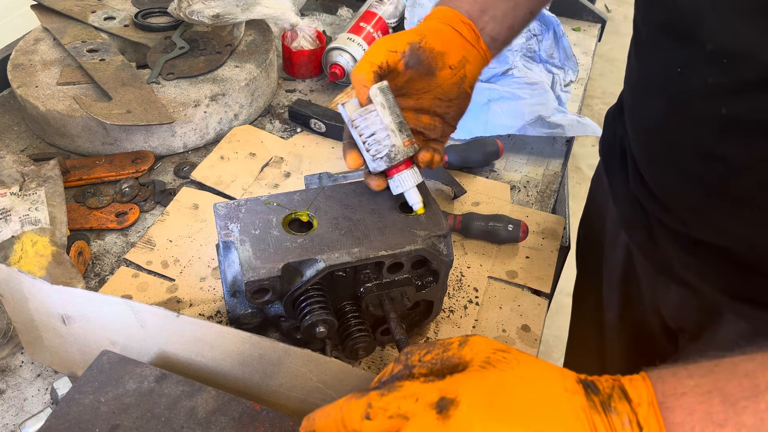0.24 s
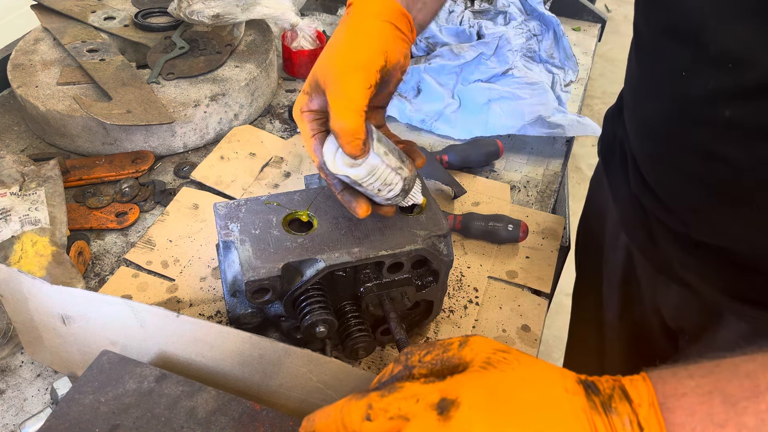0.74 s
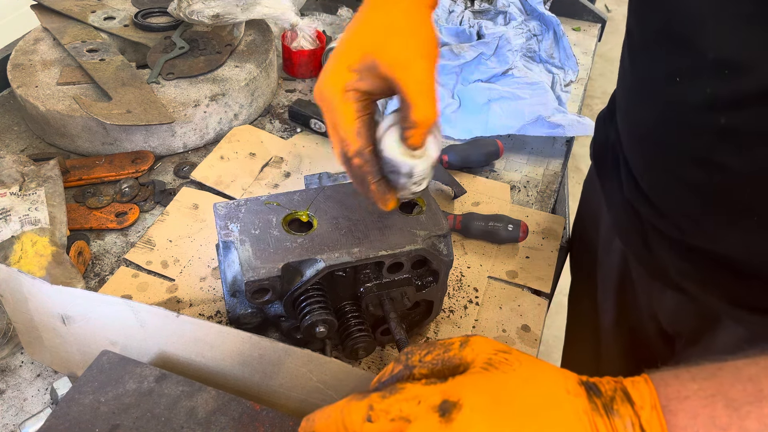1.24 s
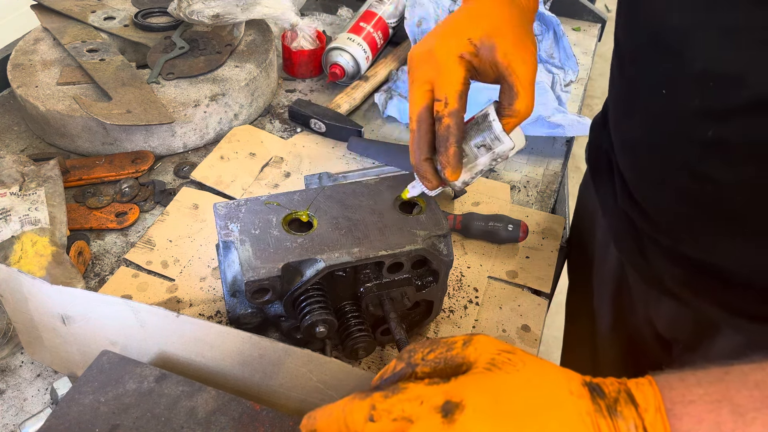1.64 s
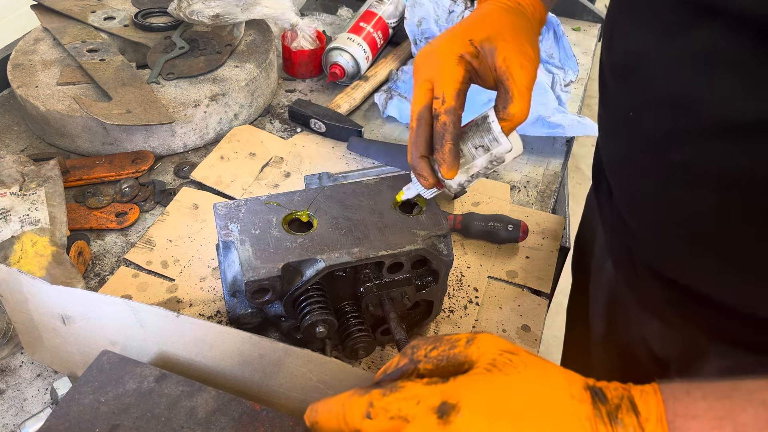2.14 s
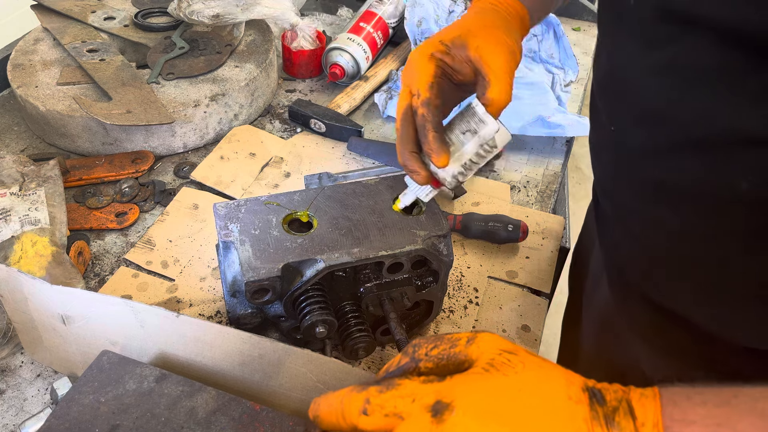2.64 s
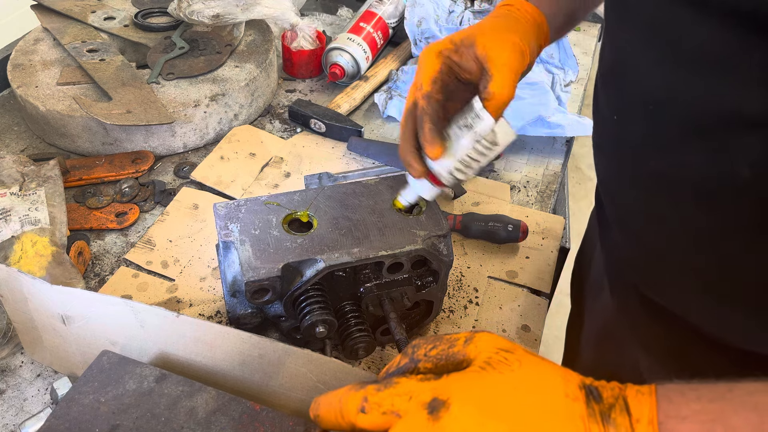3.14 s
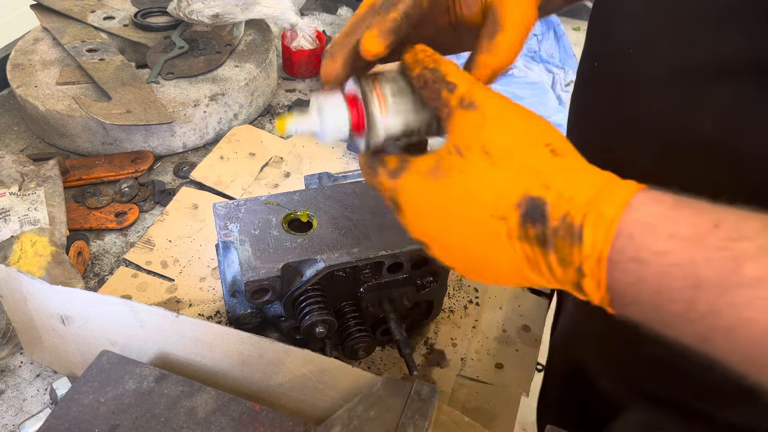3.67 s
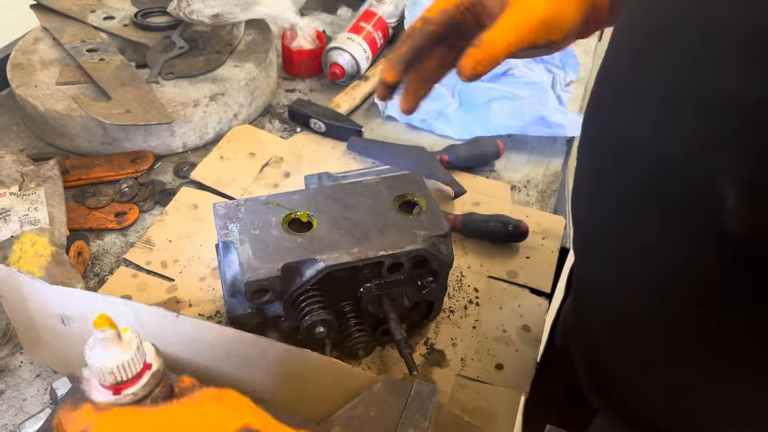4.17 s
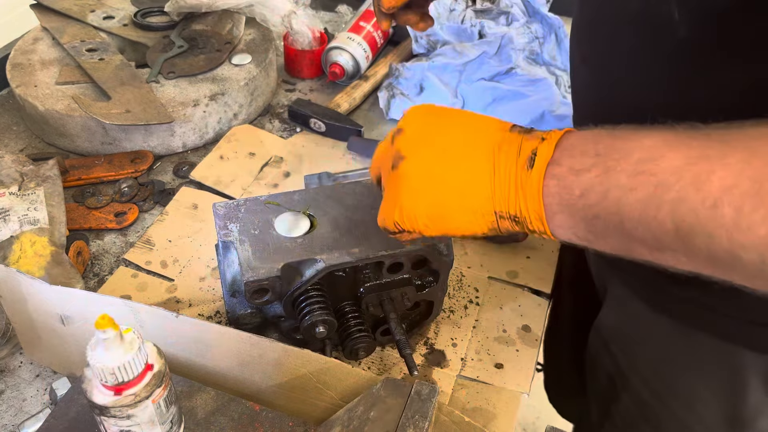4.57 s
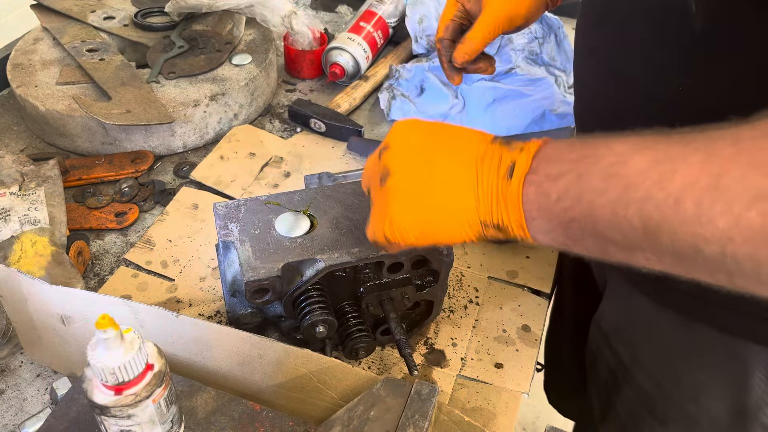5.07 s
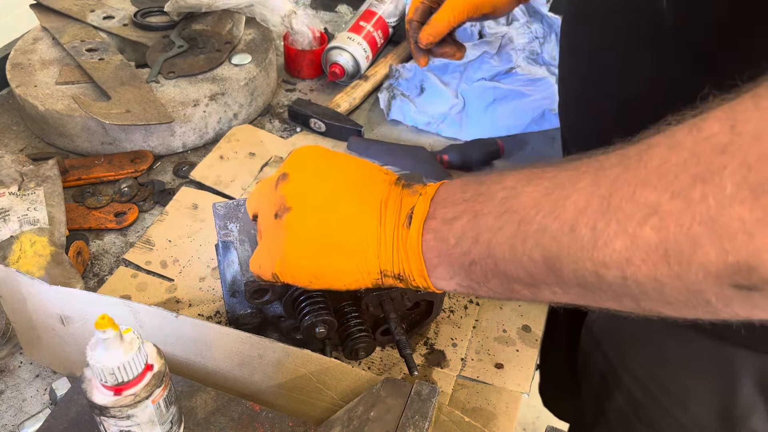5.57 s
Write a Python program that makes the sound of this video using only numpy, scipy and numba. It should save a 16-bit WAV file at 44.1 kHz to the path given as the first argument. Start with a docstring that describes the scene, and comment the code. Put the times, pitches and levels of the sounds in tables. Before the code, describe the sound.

A plastic bottle's nozzle drags over an iron casting from the start until about 3.2 seconds. It sticks and slips in faint, gritty, slightly hollow strokes, with scattered ticks and soft thuds as it bumps the rims of holes. From around 3.3 seconds a rubber glove swishes softly, with a small tick at 3.7. At about 4.2 seconds the bottle lands on the bench with one sharp, hollow knock, by far the loudest sound. Metal plugs then clink brightly onto the casting at 4.3 and 4.6 seconds, the second rocking briefly. Lighter clicks follow at 4.9, a tap with a soft thump at 5.1, and small nudging ticks near 5.4 and 5.8, with faint glove brushes. Distant engines drone quietly throughout, turning a little higher and wavering after 4.3 seconds. A phone microphone hears it all from close by, in a workshop with a short echo.

```python
"""A sealant bottle's nozzle is dragged round two holes in an iron casting, in a workshop. It sticks and
slips, which makes the plastic bottle ring. A gloved hand swings across with a rustle and puts the bottle
down with a hollow knock. Then the scene changes: metal plugs clink as they are dropped onto the holes
and nudged into place. Engines drone faintly outside, and a phone close by picks it all up."""
import sys
import numpy as np
from scipy import signal
from scipy.fft import rfft, irfft
from scipy.io import wavfile
from scipy.ndimage import uniform_filter1d
from numba import njit

SR = 44100
rng = np.random.default_rng(int(sys.argv[2]) if len(sys.argv) > 2 else 0)


def wav_out(sig):
    """Save sig, one row per channel (or a flat mono array), as 16-bit PCM at SR to the path in sys.argv[1]."""
    wavfile.write(sys.argv[1], SR, np.round(np.clip(np.atleast_2d(sig).T, -1, 1) * 32767).astype(np.int16))


N = 256220
T = np.arange(N) / SR

# Background rumble and hiss in each scene. Each row: frequency in Hz, relative level in dB.
BOTTLE_SCENE_AIR = [(29, -27), (50, -8.5), (140, -20.5), (161, -30.5), (195, -27), (613, -47.5),
                    (1790, -54), (2890, -70.5), (3760, -58.5), (8460, -69), (9530, -80), (11800, -61),
                    (13500, -73), (14500, -86.5)]
PLUG_SCENE_AIR = [(35, -31.5), (60, -25.5), (102, -1.5), (246, -10.5), (317, -17), (503, -27),
                  (1180, -40.5), (1270, -38.5), (2780, -51), (3270, -46), (4840, -54), (9670, -51),
                  (15000, -61)]
# Engine tones. Each row: time in seconds, pitch in Hz, level in dB.
ENGINE_IDLE = [(0.0, 48.5, -64), (0.1, 41.5, -66), (0.15, 41.9, -55.5), (0.74, 42.38, -47),
               (1.18, 44.3, -48), (2.33, 43.3, -48), (2.69, 45.87, -72), (3.27, 44.25, -59),
               (3.47, 44.8, -51), (3.7, 41.8, -48.5), (4.15, 45.7, -79)]
ENGINE_REVVING = [(4.27, 104.2, -62), (4.442, 103, -56), (4.858, 140.3, -58.5), (5.034, 138, -54),
                  (5.144, 151.4, -55.5), (5.518, 140.1, -56.5), (5.584, 148.7, -67.5), (5.81, 148.8, -61.5)]
ENGINE_DRONE = [(4.5, 60.1, -76), (4.7, 61.6, -60), (4.85, 65.45, -65), (4.93, 68.2, -82),
                (5.11, 72.05, -52), (5.53, 71.8, -54), (5.81, 68, -71)]
ENGINE_WHINE = [(4.27, 244.2, -70), (4.35, 244.1, -53.5), (4.522, 247.3, -70.5), (4.72, 244, -60),
                (4.824, 244, -72.5), (5.458, 233.3, -73), (5.81, 243.3, -67.5)]
# Bands of noise from the engines, the glove and the dragged bottle.
# Each row: centre in Hz, width in Hz, relative level in dB.
ENGINE_RUMBLE = [(70, 1.4, -70.5), (90, 5.7, -71), (146.6, 7.1, -70)]
GLOVE_SWISH = [(3760, 2650, 0)]
GLOVE_TREBLE = [(7700, 2500, 1), (11400, 2400, 3)]
GLOVE_RUB = [(574, 590, 2), (1568, 1260, -3)]
DRAG_BELLY = [(460, 540, 0)]
DRAG_UPPER = [(3030, 250, -17), (3257, 107, -19), (4400, 780, -19)]
DRAG_SCRATCH = [(2610, 1270, 1), (4380, 2700, -0.5)]
DRAG_TREBLE = [(7270, 810, 2.5), (8530, 1360, 2.5), (11650, 3000, 6.5)]
# The arm swings across and back. Each row: time in seconds, swish level in dB, then treble and rub
# in dB compared with the swish.
ARM_SWING = [(3.27, -93, -7, 2), (3.352, -84.5, 10.5, -1.5), (3.404, -79.5, 2, 0), (3.444, -93, 8.5, 5.5),
             (3.634, -72, 5, -3), (3.67, -78.5, 7, 1), (3.724, -58.5, 4, -3.5), (3.736, -69.5, 1, 1.5),
             (3.888, -83, 2, 10), (3.974, -103, 10, -7), (4.004, -71, 7, -28), (4.018, -70.5, 6, -7.5),
             (4.118, -88, 10, 4), (4.13, -91, -4, 2)]
# Short glove rustles. Each row: start, loudest moment and end in seconds, level in dB, rub in dB
# compared with the swish.
GLOVE_BRUSHES = [(5.127, 5.192, 5.25, -70, -3), (5.66, 5.684, 5.72, -79.5, -9.5),
                 (5.732, 5.775, 6.1, -76.5, -20)]
# The notes that struck things ring with. Each row: pitch in Hz, relative level in dB, ring time in
# seconds (the time to fade by 60 dB).
CASTING_LOW_NOTES = [(631, -1, 0.029), (707.4, 3.5, 0.047)]
CASTING_NOTES = [(1720, -4, .04), (2150, -4, .02), (2540, -3, .025), (3400, -5, .02), (4800, -9, .03),
                 (5459, -14, .025), (6089, -18, .03)]
PLUG_LOW_NOTES = [(1745, -7, .12), (2980, -9, .05), (3155, 3, .05), (3520, -1, .04), (4290, -14, .05),
                  (5459, -7, .04), (6089, -13, .05)]
PLUG_HIGH_NOTES = [(7480, -1.5, 0.038), (10200, 9, 0.017), (9210, 12.5, 0.13), (9600, 9.5, 0.03),
                   (11720, -1, 0.05), (12780, -4.5, 0.03)]
ROCKING_NOTES = [(690, 0, .03), (1745, -13.5, 0.0548), (2954, 2.5, 0.031), (3260, -1, 0.052),
                 (3530, -4.5, 0.037)]
BENCH_NOTES = [(119, -8, 0.042), (189, -2.5, 0.039), (319, -1, 0.044), (540, -4, 0.029)]
BOTTLE_NOTES = [(1400, -16.5, 0.011), (1650, 9.5, 0.0066), (1945, -12, 0.016), (2690, -9, 0.0064),
                (3760, -18, 0.0113), (6970, -21, 0.012)]
# Plugs touch the casting. Each row: start in seconds, level in dB, boosts in dB for the casting's low
# ring and for the plug's ring, finger damping from 0 (free) to 1 (held).
PLUG_TOUCHES = [(4.3365, -38, -16, -17, 0.45), (4.3395, -31.5, -7, 3, 1), (4.3455, -35.5, -5.5, -4.5, 0.63),
                (4.3601, -32.5, -14.5, -8, 0.66), (4.388, -49, -1.5, -3, 0.84),
                (4.6470, -38.5, -35, 16.5, 0.37), (4.6489, -22, -8, 4, 0.96), (4.6748, -43, -22, 2, 0.53),
                (4.9032, -36, -13.5, -10.5, 0.36), (4.912, -41, -17, -29, 0.3), (4.9491, -60.5, 9, -22, 1),
                (5.0945, -39, -10.5, -14, 0.18), (5.3598, -44, -1.5, -21.5, 0.6),
                (5.368, -51.5, -2, -21, 0.85), (5.3744, -52.5, 1.5, -27, 0.65),
                (5.428, -49.5, -14.5, -22, 0.45), (5.4367, -43.5, -4, -8, 0.82),
                (5.4414, -48.5, 9.5, -7, 0.99), (5.767, -57, -14, -10, 1), (5.778, -63, -14, -9.5, 1),
                (5.791, -59, -10, -14, 0.97)]
# A loose plug rocks on its seat. Each row: start in seconds, level in dB.
PLUG_ROCKS = [(4.676, -42), (4.697, -50), (4.719, -53), (4.745, -60), (4.792, -58), (4.848, -63),
              (4.862, -49.5)]
# A plug pressed home thumps the bench. Each row: start in seconds, level in dB, pitch in Hz, ring time
# in seconds.
PLUG_THUMPS = [(5.096, -43, 178.5, 0.18)]
# The bottle lands: first touch, full blow, quick echo off a nearby surface.
# Each row: start in seconds, level in dB.
BOTTLE_LANDING = [(4.1609, -13.5), (4.1613, 1), (4.1722, -23.5)]
# The part of the knock that rings on in the room. Each row: centre in Hz, width in Hz, level in dB.
KNOCK_ECHO_BAND = [(1630, 330, -4.5)]
# The nozzle slides on iron. Each row: start and end in seconds, start and end level in dB.
NOZZLE_STROKES = [(0, 0.043, -75, -82), (0.091, 0.159, -90, -61), (0.207, 0.321, -72.5, -77),
                  (0.328, 0.401, -77.5, -68), (0.471, 0.587, -83.5, -67), (0.677, 0.74, -69.5, -71),
                  (0.774, 0.881, -97.5, -74), (0.9, 1.063, -66, -86.5), (1.141, 1.252, -78, -91),
                  (1.476, 1.522, -68, -70.5), (1.636, 1.749, -74.5, -84), (1.748, 1.944, -70.5, -75.5),
                  (2.031, 2.181, -67.5, -77), (2.245, 2.415, -67.5, -69), (2.45, 2.478, -80, -76),
                  (2.543, 2.611, -82.5, -61.5), (2.644, 2.655, -64, -90), (2.751, 2.813, -75, -63.5),
                  (2.797, 2.837, -71, -88), (2.888, 2.94, -75, -67.5), (2.923, 2.971, -61.5, -78.5),
                  (3.079, 3.089, -70, -68.5), (3.17, 3.265, -73, -101)]
# The nozzle bumps a rim. Each row: start in seconds, tick and thud levels in dB, tick pitch in Hz.
RIM_BUMPS = [(0.159, -48, -45, 1050), (0.3934, -47.5, -64, 950), (.714, -47.5, -57, 1390),
             (0.9047, -39, -42.5, 1040), (2.036, -77, -52, 1600), (2.277, -45.5, -61, 1480),
             (2.592, -59, -46.5, 1310), (2.7968, -45, -61, 1398), (2.932, -51, -44, 1480),
             (2.947, -75, -50, 1498), (3.086, -56, -77, 1900), (3.171, -46, -64, 3600),
             (3.171, -42, -48, 1410), (3.180, -47.5, -49, 1780), (3.72, -51, -61, 2300),
             (3.720, -40, -66, 7290)]
# How the grip colours the bottle's sound. Each row: time in seconds, main ring in Hz, then the upper,
# belly, hollow, scratch, treble and creak levels in dB compared with the main ring.
BOTTLE_GRIP = [(0, 1615, 12, -14, 3.5, -18.5, -9.5, 2.5), (.75, 1720, 10.5, -19, 0.5, -20, -7, 2),
               (.95, 1707, 10.5, 7, 2.5, -19, -16, 1), (1.3, 1690, 17, -4.5, 8.5, -19, 8, -2),
               (1.45, 1380, 5, -6, 1, -5, -10, -28), (2.35, 1350, -13, 2, -2, -23, -8.5, -15),
               (2.56, 1610, 1, 0.5, -3, -9, -10, -9.5)]
# The phone's two microphones. Each row: frequency in Hz, how far the left leads in radians, how much
# louder the left is in dB.
MICROPHONES = [(30, 0, 1.7), (1000, -.27, 1.5), (2500, -.6, -2.8), (4500, -1.2, -1.5), (6200, -2.0, -1.5),
               (8200, .3, -2.7), (10500, 1.9, -2.5), (13000, 5.2, -1.4), (16000, 8, -1.4)]


def undb(db):
    """Turn decibels into a gain."""
    return 10 ** (np.asarray(db) / 20)


def level(x, db=0):
    """Scale a sound to an average (rms) level in dB."""
    return x * undb(db) / np.sqrt(np.mean(x ** 2))


def curves(rows):
    """Join a table's timed rows with straight lines, one curve per column."""
    times, *columns = np.transpose(rows)
    return [np.interp(T, times, column) for column in columns]


@njit
def bandpass(x, hz, width):
    """Keep the sound near a centre frequency that may move."""
    out, band, low = np.empty(len(x)), 0., 0.
    for i in range(len(x)):
        tuning, loss = np.tan(np.pi * hz[i] / SR), width / hz[i]
        swing = (band + tuning * (x[i] - low)) / (1 + tuning * (tuning + loss))
        band, low = 2 * swing - band, low + 2 * tuning * swing
        out[i] = loss * swing
    return out


def bands(x, table, passes=1):
    """Keep a table's frequency bands; more passes make their edges steeper."""
    for _ in range(passes):
        x = sum(undb(db) * bandpass(x, np.full(len(x), float(hz)), float(width))
                for hz, width, db in table)
    return x


def wander(per_second):
    """A smooth random wobble, roughly 1 in size."""
    hold = int(SR / per_second)
    steps = np.repeat(rng.standard_normal(N // hold + 1), hold)
    return 1.6 * uniform_filter1d(steps, hold)[:N]


def ring(notes, push_s=0.0001, damping=0., scatter_db=3):
    """Fading notes after a blow; a longer push softens the start, damping shortens the ring."""
    t = T[:SR // 4]
    out = np.zeros(len(t))
    for hz, db, ring_s in notes:
        gain = undb(db + scatter_db * rng.standard_normal())
        detune = 1 + rng.standard_normal() / 150
        fade_s = max(ring_s * (1 - .9 * damping), 1 / hz)
        out += gain * np.sin(2 * np.pi * hz * detune * t) * 1000. ** (-t / fade_s)
    out *= 1 - np.exp(-(t / push_s) ** 2)
    return out / np.abs(out).max()


def tick(fade_s, hz, width, passes=2):
    """A short burst of noise in one band."""
    t = T[:SR // 4]
    burst = rng.standard_normal(len(t)) * 1000. ** (-t / fade_s)
    burst = bands(burst, [(hz, width, 0)], passes)
    return burst / np.abs(burst).max()


def add(out, start_s, x):
    """Mix a sound into out at a start time."""
    i = int(start_s * SR)
    out[i:i + len(x)] += x[:N - i]


def room(x, low_fade_s=0.39, high_fade_s=0.55):
    """The workshop's echoes in stereo; nearby surfaces answer first and loudest."""
    t = T[:SR]
    noise = rng.standard_normal((2, SR))
    low = signal.sosfilt(signal.butter(1, 3000, fs=SR, output="sos"), noise)
    tail = (low + 0.039 * low[::-1]) * 1000. ** (-t / low_fade_s)
    tail += (noise - low) * 1000. ** (-t / high_fade_s)
    tail *= np.clip(t / 0.0022, 0, 1) * (1 + 2 * np.exp(-t / 0.0096))
    tail /= np.sqrt(np.sum(tail ** 2) / 2)
    return signal.fftconvolve(x[None], tail, axes=1)[:, :N]


def air(spectrum, db):
    """Soft rumble and hiss; left and right are alike in the bass, less so in the treble."""
    freqs = np.arange(N // 2 + 1) * SR / N + 1
    hz, shape_db = np.transpose(spectrum)
    colour = undb(np.interp(np.log(freqs), np.log(hz), shape_db, left=-60))
    mid, side = rfft(rng.standard_normal((2, N))) * colour
    side *= np.clip(.2 + freqs / 5000, 0, .7)
    stereo = irfft(np.array([mid + side, mid - side]), N)
    return level(stereo, db) * undb(0.99 * wander(1.8))


def engine(rows, waver=0.00604, flutter_db=1.5):
    """An engine outside: one tone that wavers in pitch and loudness."""
    hz, db = curves(rows)
    phase = 2 * np.pi * np.cumsum(hz * (1 + waver * wander(4.8))) / SR
    return np.sqrt(2) * np.sin(phase) * undb(db + flutter_db * wander(20)) * (T >= rows[0][0])


def engine_rumble():
    """Engine tones blurred into narrow bands of low noise."""
    return sum(level(bands(rng.standard_normal(N), [(hz, width, 0)]), db)
               for hz, width, db in ENGINE_RUMBLE)


def glove():
    """A rubbery glove rustles, a bright swish over a dull rub: one long swing, then short brushes."""
    friction = rng.standard_normal(N) * undb(1.5 * wander(110) + wander(40))
    swish, treble, rub = (level(bands(friction, table, passes=2))
                          for table in (GLOVE_SWISH, GLOVE_TREBLE, GLOVE_RUB))
    arm_db, treble_db, rub_db = curves(ARM_SWING)
    out = undb(arm_db) * (swish + undb(treble_db) * treble - undb(rub_db) * rub)
    out *= (T >= ARM_SWING[0][0]) & (T <= ARM_SWING[-1][0])
    for start, peak, end, db, rub_db in GLOVE_BRUSHES:
        swell_db = np.interp(T, [start, peak, end], [-14, 0, -14])
        brush = swish + 0.83 * treble - undb(rub_db) * rub
        out += undb(db + swell_db) * brush * (T >= start) * (T <= end)
    return out


def plug_clinks():
    """Each touch rings both plug and casting; one plug rocks, and one is pressed home with a thump."""
    out = np.zeros(N)
    for start, db, low_db, plug_db, damping in PLUG_TOUCHES:
        free = 1 - damping  # a free plug rings more, a held one ticks more
        tick_hz = 2516 * 2 ** (-low_db / 14.5)  # less low ring, higher tick
        hit = (1 - .6 * free) * tick(.02, tick_hz, 1.5 * tick_hz)
        hit += 1.1 * free * ring(CASTING_NOTES, damping=damping)
        hit += undb(low_db) * ring(CASTING_LOW_NOTES, push_s=0.0022, damping=.4 * damping)
        bright = 0.201 * ring(PLUG_HIGH_NOTES, damping=damping) + 0.92 * tick(0.0042, 10070, 4600)
        hit += undb(plug_db) * bright
        hit += undb(plug_db + 1) * free * ring(PLUG_LOW_NOTES, damping=damping, scatter_db=1.5)
        add(out, start, undb(db) * hit)
    for start, db in PLUG_ROCKS:
        add(out, start, undb(db) * ring(ROCKING_NOTES, push_s=0.0026))
    for start, db, hz, ring_s in PLUG_THUMPS:
        add(out, start, undb(db) * ring([(hz, 0, ring_s)], push_s=0.00067))
    return out


def bottle_knock():
    """The hollow bottle meets the bench: a tick, a ringing blow and a faint quick echo."""
    out = np.zeros(N)
    (touch_s, touch_db), *blow_and_echo = BOTTLE_LANDING
    add(out, touch_s, undb(touch_db) * tick(0.0099, 4300, 4200))
    for start, db in blow_and_echo:
        bottle = ring(BOTTLE_NOTES, push_s=0.00067, scatter_db=2) + 0.12 * tick(0.017, 3900, 4500)
        bench = ring(BENCH_NOTES, push_s=0.002, scatter_db=1.5)
        add(out, start, undb(db) * (bottle + undb(-24) * bench))
    return out


def nozzle_drag(edge_s=0.016, creak_width_hz=132.):
    """The nozzle sticks and slips on the iron, and this gritty shaking rings the bottle."""
    strokes = np.zeros(N)
    for start, end, start_db, end_db in NOZZLE_STROKES:
        sliding = (T >= start) & (T < end)
        strokes[sliding] = undb(np.interp(T[sliding], [start, end], [start_db, end_db]))
    strokes = np.abs(uniform_filter1d(strokes, int(edge_s * SR)))
    hz, upper_db, belly_db, hollow_db, scratch_db, treble_db, creak_db = curves(BOTTLE_GRIP)
    grit = rng.standard_normal(N) * undb(2.3 * wander(300) + 1.3 * wander(60))
    hiss = rng.standard_normal(N) * undb(2.7 * wander(300))
    main_ring = level(bandpass(bandpass(grit, hz, 480.), hz, 500.))
    creak = level(bandpass(bandpass(grit, hz, creak_width_hz), hz, creak_width_hz), creak_db)
    upper = sum(level(bands(grit, [(centre, width, 0)], passes=2), db + upper_db)
                for centre, width, db in DRAG_UPPER)
    hollow = level(bands(bands(grit, [(983, 600, 0)]), [(983, 800, 0)]), hollow_db)
    belly = level(bands(grit, DRAG_BELLY, passes=2), belly_db)
    scratch = level(bands(grit, DRAG_SCRATCH, passes=2), scratch_db)
    treble = level(bands(hiss, DRAG_TREBLE, passes=2), treble_db)
    return (main_ring + creak + upper + hollow + belly - scratch + treble) * strokes


def nozzle_bumps(thud_hz=289.8):
    """The nozzle bumps the rim of a hole, each time with a tick and a soft thud."""
    out = np.zeros(N)
    notes = [(thud_hz, 0, .055), (2.4 * thud_hz, -14, .02), (1.3 * thud_hz, -8, .03)]
    for start, tick_db, thud_db, tick_hz in RIM_BUMPS:
        add(out, start, undb(thud_db) * ring(notes, push_s=0.0021))
        add(out, start, undb(tick_db) * tick(0.012, tick_hz, 0.8 * tick_hz, passes=3))
    return out


def scene(change_s=4.275, fade_s=0.0089):
    """The bottle scene fades quickly out, then the plug scene fades in."""
    nozzle = nozzle_drag() + nozzle_bumps()
    knock, clinks, rustle = bottle_knock(), plug_clinks(), glove()
    first = engine_rumble() + engine(ENGINE_IDLE, waver=0.003, flutter_db=1.44)
    first = first + air(BOTTLE_SCENE_AIR, -58) + nozzle + knock
    # most of the hollow note stays close by; only its narrow core echoes
    far_knock = knock - 0.85 * bands(knock, [(1800, 1500, 0)]) + bands(knock, KNOCK_ECHO_BAND)
    first += room(undb(-5.5) * nozzle + undb(-7.5) * far_knock)
    second = engine(ENGINE_REVVING) + engine(ENGINE_DRONE) + engine(ENGINE_WHINE)
    second = second + air(PLUG_SCENE_AIR, -59) + clinks
    # the plug scene lacks the deepest rumble
    second = signal.sosfilt(signal.butter(4, 58, "high", fs=SR, output="sos"), second)
    second += room(undb(-7) * clinks)
    ramp = (T - change_s) / fade_s
    return first * np.clip(-ramp, 0, 1) + second * np.clip(ramp, 0, 1) + rustle


def record(dry):
    """Each microphone has its own lag and level; the phone rounds peaks and cuts deep bass and top."""
    freqs = np.arange(N // 2 + 1) * SR / N + 1
    hz, lead_radians, louder_db = np.transpose(MICROPHONES)
    left_gain = undb(np.interp(np.log(freqs), np.log(hz), louder_db) / 2)
    left = left_gain * np.exp(.5j * np.interp(freqs, hz, lead_radians))
    stereo = np.tanh(irfft(rfft(dry) * np.array([left, 1 / left]), N))
    stereo = signal.sosfilt(signal.butter(4, 36, "high", fs=SR, output="sos"), stereo)
    return signal.sosfilt(signal.ellip(10, .2, 80, 16500, fs=SR, output="sos"), stereo)


dry = scene()
out = record(dry)
wav_out(out)
```